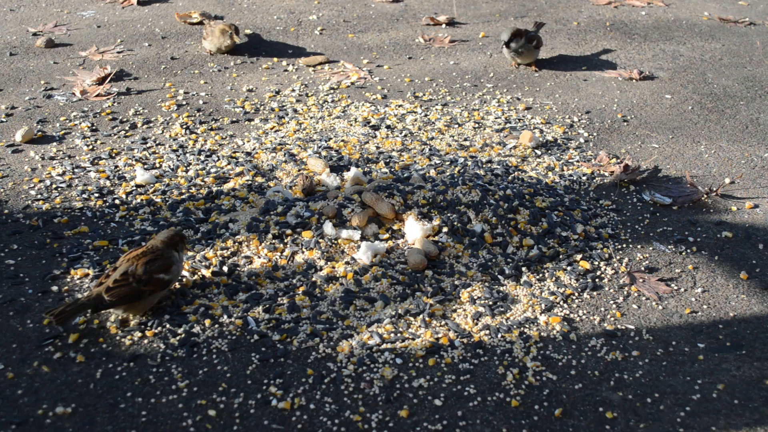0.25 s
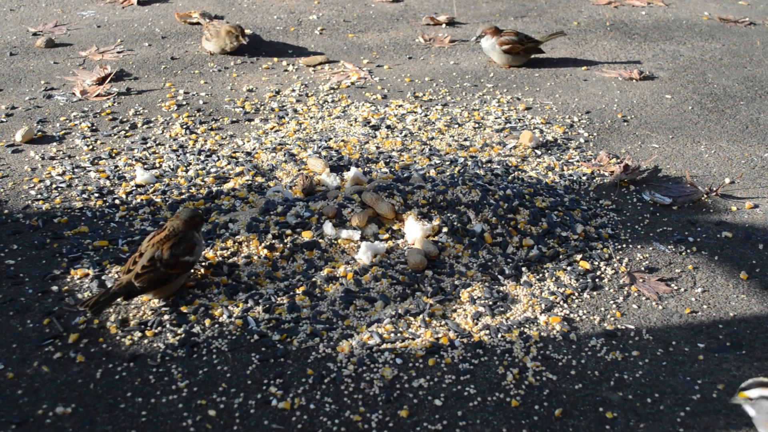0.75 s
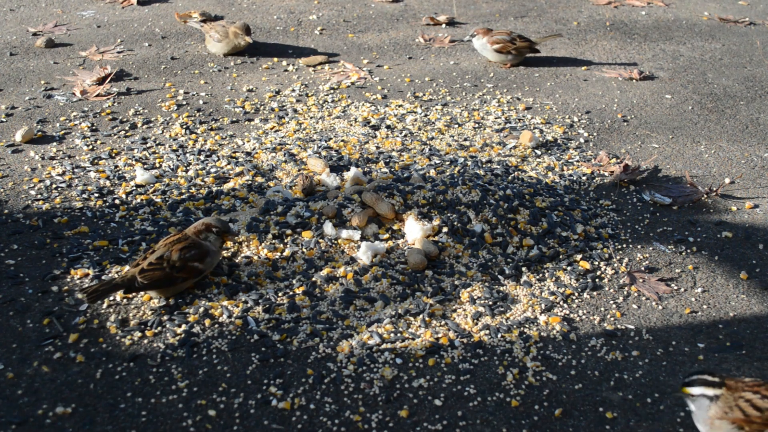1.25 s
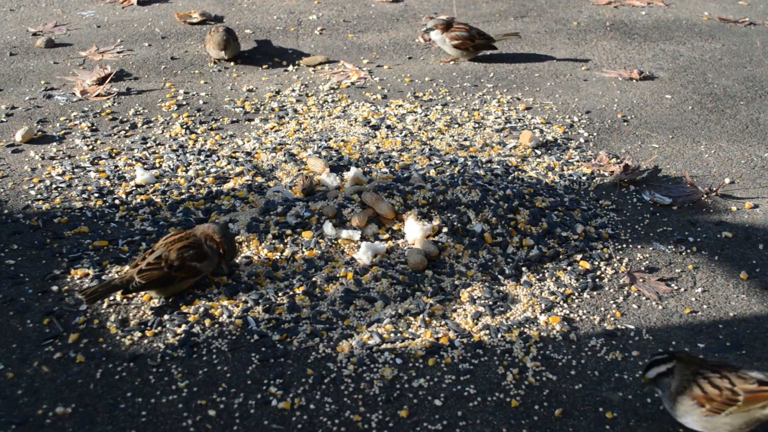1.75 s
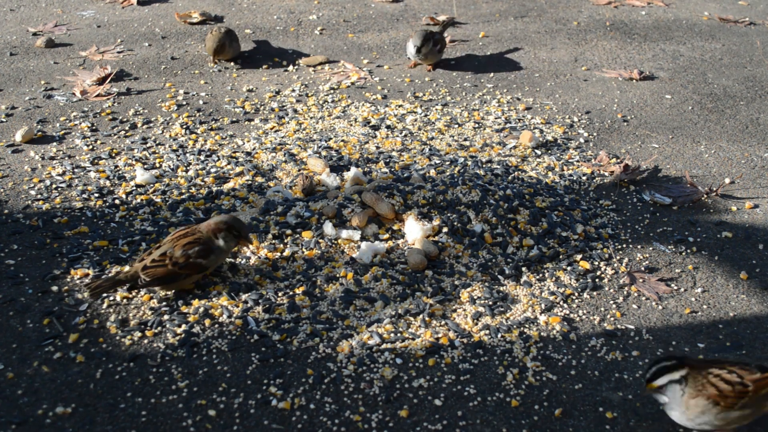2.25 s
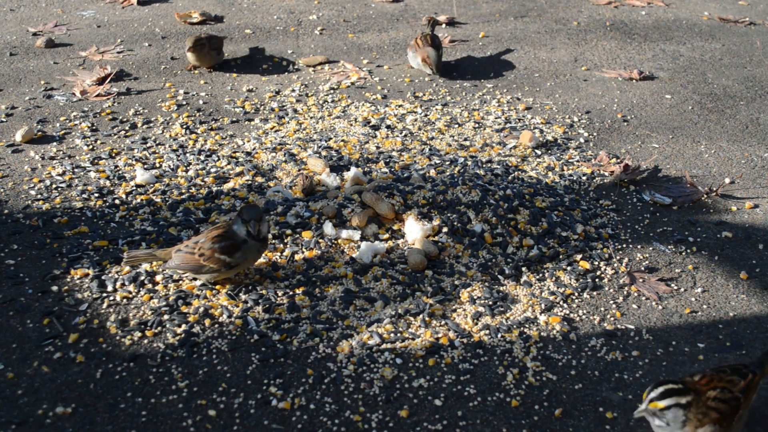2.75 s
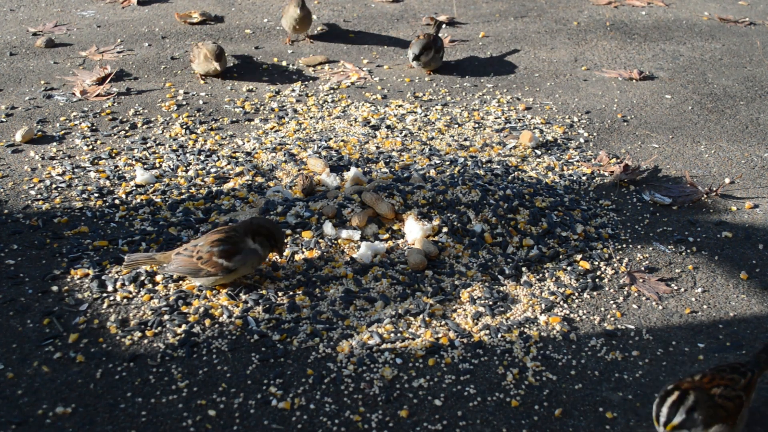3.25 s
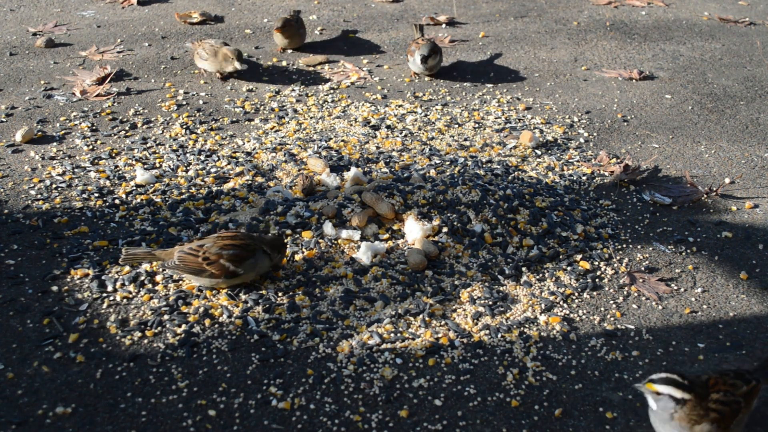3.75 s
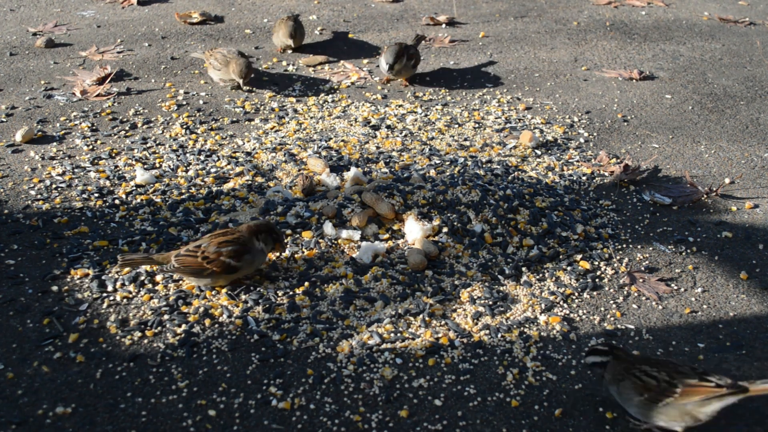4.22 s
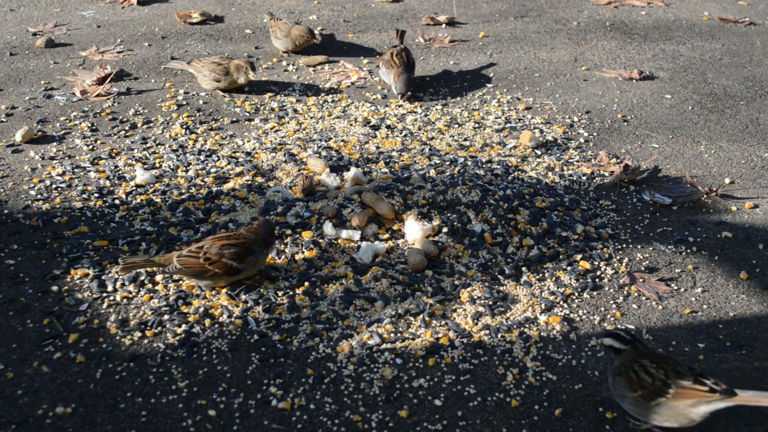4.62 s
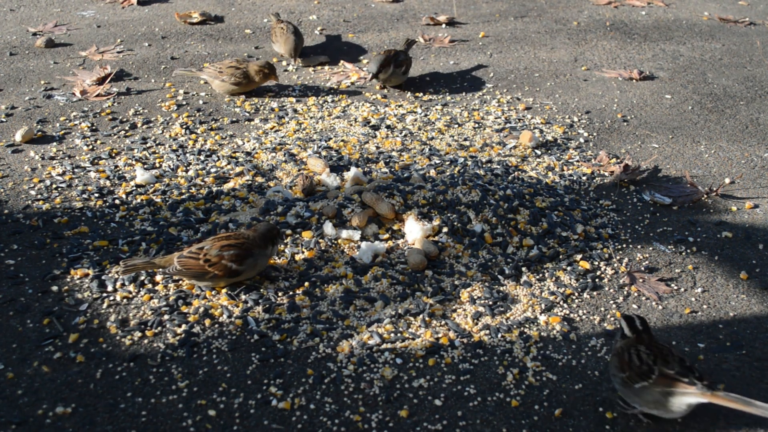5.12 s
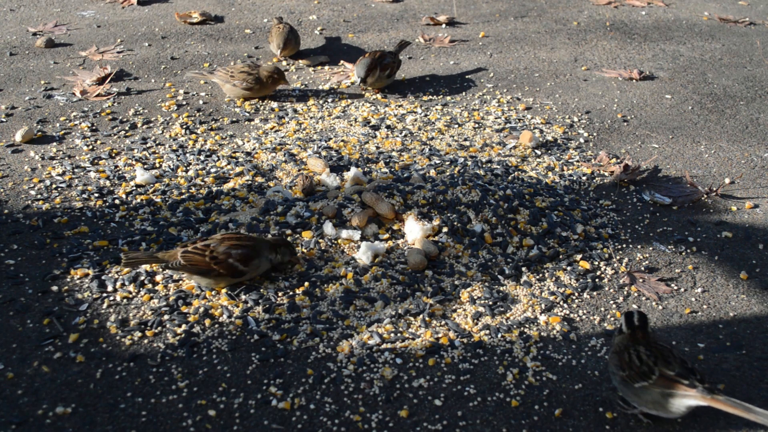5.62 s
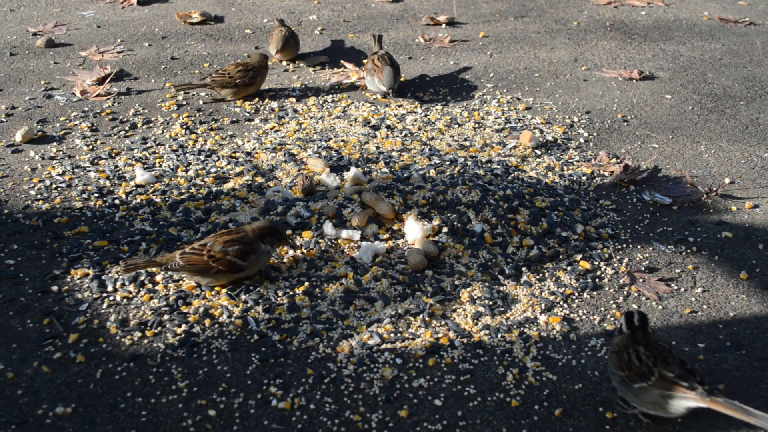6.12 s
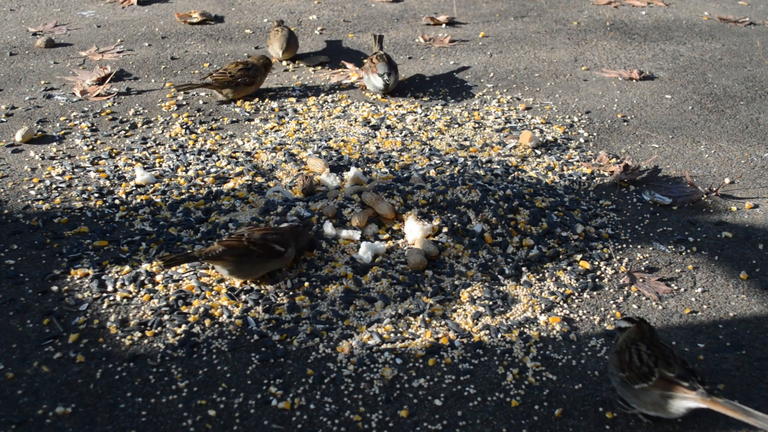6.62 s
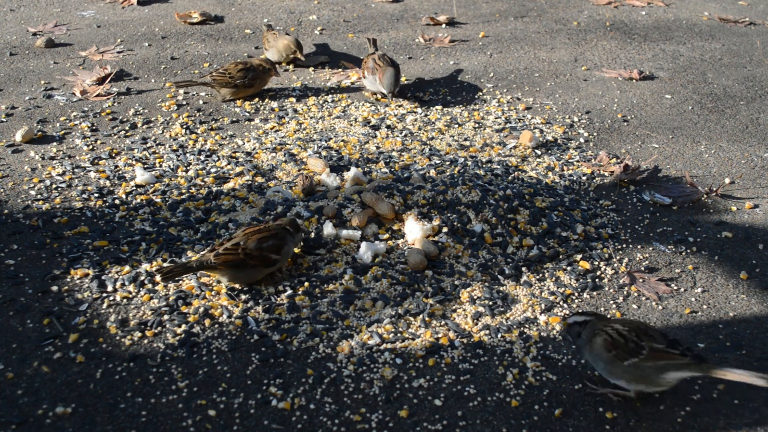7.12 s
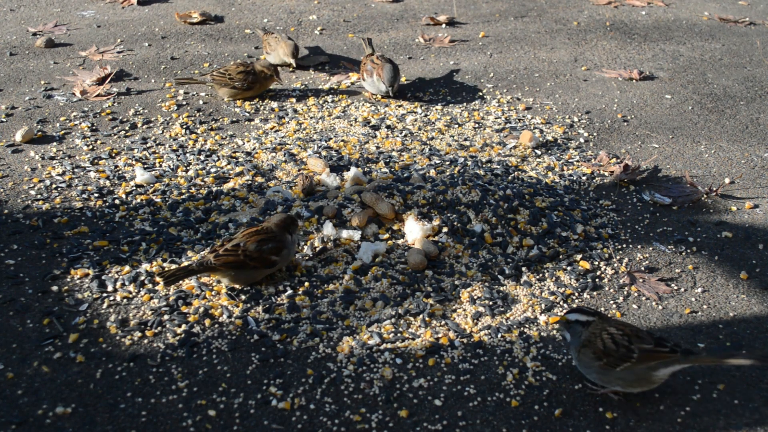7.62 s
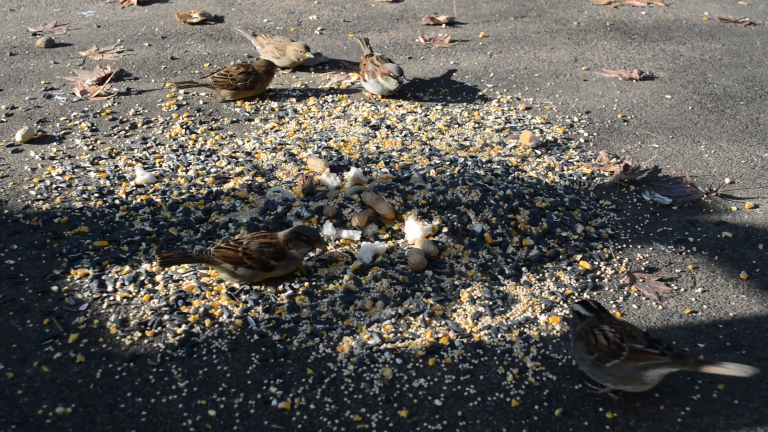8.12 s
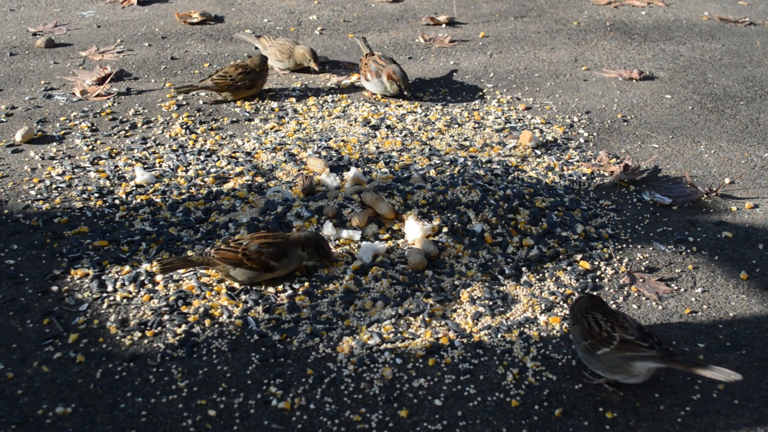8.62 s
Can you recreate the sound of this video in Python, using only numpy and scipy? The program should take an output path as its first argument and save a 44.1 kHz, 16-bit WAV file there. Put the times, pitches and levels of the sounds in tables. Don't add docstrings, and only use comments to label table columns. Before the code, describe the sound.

A close microphone on pavement catches seed hulls splitting in crisp, bright clicks, beaks tapping, and grains ticking as birds move. Delicate chime-like clinks scatter through, thickening in the second half. Two quick hollow wing beats, later a duller flutter, then a feathery landing whoosh break the pecking. Behind lie faint low traffic hum, soft hiss and a steady high electronic whine, with momentary thinning gaps and little echo.

```python
import sys
import numpy as np
from scipy import signal
from scipy.fft import rfft, irfft
from scipy.io import wavfile
from scipy.ndimage import uniform_filter1d, minimum_filter1d

SR = 44100
rng = np.random.default_rng(int(sys.argv[2]) if len(sys.argv) > 2 else 0)


def voltage_ratio(level):
    return 10 ** (np.asarray(level, float) / 20)


def waveform_to_disk(signal):
    frames = np.transpose(np.atleast_2d(signal))
    scaled = np.clip(frames, -1, 1) * 32767
    samples = np.round(scaled).astype(np.int16)
    wavfile.write(sys.argv[1], SR, samples)


N = 390725

CHIME_MODES = [(1545, 1604, 3472, 3628, 4042, 6363, 6395), (1545, 1604, 2923, 4042, 7375, 11498),
               (1545, 4042, 5194, 5760, 6228, 7375), (3472, 6761, 6815, 7375, 9167, 10502),
               (2923, 3719, 4042, 5760, 6228, 6395, 7375, 8284, 8893),
               (3472, 4586, 8408, 8473, 9501, 10852, 11267, 11337), (2029, 3359, 8408, 10852),
               (3359, 4225, 5404, 6056, 6578, 9636), (3719, 5060, 8893), (3628, 4586, 5060, 8408, 9991),
               (4166, 5060, 6976, 7821, 9167), (4225, 9356), (4166, 4225, 9636, 9695, 11267),
               (9695, 10239, 10325, 11035, 12037, 12150, 12182), (10131, 10852, 10933, 11773, 13571),
               (1713, 3478), (1781, 4591)]
# frequency in Hz, gain in dB.
CAPSULE_COLOUR = [(1200, 7.5), (3000, 3), (6000, -0.5), (8300, -2), (9800, 3), (12000, -4.5), (16500, -15)]
WHINE_HZ = 15687.3


def read(points, hz):
    f, value = np.transpose(points)
    return np.interp(np.log(hz + 1), np.log(f + 1), value)


def evened(x):
    return x / np.sqrt(np.mean(x ** 2) + 1e-20)


def add(mix, s, sound):
    part = mix[max(round(s * SR), 0):][:len(sound)]
    part += sound[:len(part)]


def coloured(x, points):
    gain = voltage_ratio(read(points, np.fft.rfftfreq(len(x), 1 / SR)))
    return irfft(rfft(x) * gain, len(x))


def ring(hz, t60, t, phase=0):
    return voltage_ratio(-60 * t / t60) * np.sin(2 * np.pi * (hz * t + phase))


def street():
    # frequency in Hz, density in dB per Hz.
    bed = [(15, -32), (30, -60), (70, 1), (115, 1), (250, -8), (420, -17), (1050, -17), (2150, -20),
           (2700, -26.5), (7000, -29.5), (9600, -26.5), (12000, -39), (15500, -30)]
    frames, hz = N // 256 + 5, np.fft.rfftfreq(1024, 1 / SR)
    a, b, patches = rng.standard_normal((frames, 513, 3)).T
    patches = uniform_filter1d(patches, 14, 0)
    patches = evened(uniform_filter1d(patches, 8, 1))
    z = (a + 1j * b) * voltage_ratio(read(bed, hz)[:, None] + 1.4 * patches)
    noise = signal.istft(z, nperseg=1024, noverlap=768)[1][:N]
    return voltage_ratio(-45.5) * evened(noise)


def steady_tones():
    t = np.arange(N) / SR
    whine = voltage_ratio(-58) * np.sin(2 * np.pi * WHINE_HZ * t)
    hum = voltage_ratio(-53) * np.sin(2 * np.pi * 119.5 * t)
    return whine + hum


def seed_ticks():
    t, out = np.arange(1024) / SR, np.zeros(N)
    ticks_per_s = 4000
    size = voltage_ratio(2.6 * np.minimum(rng.exponential(1, N), 4)) * (rng.random(N) < ticks_per_s / SR)
    kind = rng.integers(0, 30, N)
    pitches = np.linspace(3400, 14000, 30) + rng.uniform(-300, 290, 30)
    lengths = rng.permutation(np.geomspace(6, 45, 30))
    for k, (hz, cycles) in enumerate(zip(pitches, lengths)):
        grain = ring(hz, cycles * 2.3 / hz, t)
        grain = grain / np.linalg.norm(grain)
        out += signal.oaconvolve(size * (kind == k), grain)[:N]
    return out


def breeze_touches():
    out, t = np.zeros(N), np.arange(4096) / SR
    touches_per_s, t60_s = 90, 0.08
    modes = sorted({hz for piece in CHIME_MODES for hz in piece if hz > 3300})
    chance = rng.random((round(touches_per_s * N / SR), 3))
    for at, which, strength in chance:
        hz = modes[int(which * len(modes))]
        add(out, at * N / SR, strength ** 2 * ring(hz, t60_s, t))
    return out


def rustle():
    # time in seconds, level in dB.
    swell = [(0.0, -47), (0.19, -53), (0.67, -58.5), (2.74, -55.5), (3.5, -50.5), (4.14, -55.5),
             (4.39, -51.5), (4.81, -54), (4.91, -51), (5.31, -58), (5.53, -50.5), (6.69, -52.5),
             (6.96, -49), (7.72, -52), (7.95, -50), (8.86, -54.5)]
    out = evened(seed_ticks()) + voltage_ratio(-9) * evened(breeze_touches())
    out = coloured(out, CAPSULE_COLOUR)
    out = coloured(out, [(9800, -4.5), (12000, -4), (14500, -12)])
    s, db = np.transpose(swell)
    return voltage_ratio(np.interp(np.arange(N) / SR, s, db)) * evened(out)


def wings():
    # start in seconds, peak in dB, thump in Hz, length in seconds, swish in dB.
    strokes = [
        (5.611, -28.5, 777, 0.022, -6.5),
        (5.648, -31, 780, 0.01, -3),
        (6.586, -33, 638, 0.07, -12),
        (6.637, -35.5, 1156, 0.022, -7),
        (6.685, -35, 810, 0.019, -8),
        (7.98, -33, 940, 0.034, -5.5),
        (8.013, -39, 520, 0.15, -7),
        (8.198, -41, 920, 0.03, -3),
    ]
    # start in seconds, length in seconds, level in dB.
    downwash = [
        (7.973, 0.092, -47),
        (8.099, 0.29, -51),
        (6.56, 0.16, -49.5),
    ]
    out, t = np.zeros(N), np.arange(4096) / SR
    feathers = [(450, -17), (900, -7.0), (2000, -11.5), (5000, -16.5), (10000, -13.5), (14000, -33)]
    noises = rng.standard_normal((len(strokes), len(t)))
    for (s, db, hz, length, swish_db), noise in zip(strokes, noises):
        fade = np.minimum(t / 0.00048, 1) * np.exp(-(t / length) ** 2)
        swish = voltage_ratio(swish_db) * evened(coloured(noise, feathers)) * fade
        thump = 1.37 * ring(hz, 0.029, t) + 0.79 * ring(1.86 * hz, 0.028, t)
        add(out, s, voltage_ratio(db) * (np.minimum(t / 0.0027, 1) * thump + swish))
    for s, length, db in downwash:
        puff = coloured(rng.standard_normal(16384), [(120, -16), (250, -6), (520, -5), (900, -29)])
        u = np.arange(len(puff)) / SR / length
        add(out, s, voltage_ratio(db) * evened(puff) * np.minimum(10 * u, 1) * np.exp(-u ** 2))
    return out


def flutter(t):
    flutter_s, depth_db = 0.005, 4
    width = round(flutter_s * SR)
    drift = uniform_filter1d(rng.standard_normal((40, len(t))), width, axis=1)
    drift = evened(uniform_filter1d(drift, width, axis=1))
    return depth_db * drift * np.minimum(t / flutter_s / 3, 1) ** 2


def high_spray(t):
    modes = []
    for hz in rng.uniform(1800, 15000, 120):
        gain = voltage_ratio(1.7 * read(CAPSULE_COLOUR, hz)) * min(hz / 6500, 1) ** 2
        modes.append(gain * ring(hz, 0.055, t, rng.random()))
    return np.array(modes)


def piece_rings(modes, voicing, t):
    rings = []
    for hz, (db, t60) in zip(modes, voicing):
        linger = voltage_ratio(-12 - 0.21 * hz / 1000)
        rings.append(voltage_ratio(db) * (ring(hz, t60, t) + linger * ring(hz + 1.5, 2.8 * t60, t)))
    return np.array(rings)


def blow_shade(s, modes, chance_db):
    # time in seconds, tilt in dB per octave.
    treble_tilts = [(1.18, -2), (1.227, -6), (1.741, 9), (3.28, -1), (4.229, 9), (4.419, 8), (5.08, -19),
                    (5.465, -8), (6.104, -16), (6.201, -6), (6.313, 8), (6.848, -14), (7.04, -18), (7.07, 23),
                    (7.145, -10), (7.203, -14), (7.526, -10), (7.626, -6), (8.059, 9), (8.472, -27)]
    # time in seconds, mode in Hz.
    weak_modes = [(7.859, 9356), (7.04, 4225), (6.835, 4225), (5.08, 3472), (3.53, 6228), (2.09, 9356),
                  (5.983, 9356), (4.718, 9636), (8.059, 9991), (7.069, 8893), (3.471, 9356),
                  (7.952, 9695), (6.313, 9356), (3.76, 11773), (3.411, 3359), (4.718, 6578), (.414, 9167),
                  (6.436, 6228), (8.471, 5194), (7.203, 6395), (1.741, 9167)]
    tilt_db = sum(db for at, db in treble_tilts if abs(at - s) < 0.005)
    tilt_from_hz = 5500
    shade_db = chance_db + tilt_db * np.log2(np.maximum(modes, tilt_from_hz) / tilt_from_hz)
    weak = [any(abs(at - s) < 0.004 and f == hz for at, f in weak_modes) for hz in modes]
    return shade_db - 10.0 * np.array(weak)


def chime():
    # mode level in dB, t60 in seconds.
    voices_a_g = [
        [(-16, 0.26), (-44, 0.36), (-2.5, 0.13), (-22, 0.15), (-36, 0.3), (-10, 0.054), (2, 0.1)],
        [(-17.5, 0.52), (-31, 0.37), (-16, 0.24), (-13.5, 0.21), (1, 0.051), (-14, 0.06)],
        [(-15, 0.31), (-7, 0.26), (1.5, 0.12), (-13, 0.16), (-1, 0.33), (-14, 0.18)],
        [(2.5, 0.17), (-18, 0.14), (-0.5, 0.13), (-1, 0.13), (13, 0.051), (-1, 0.067)],
        [(-12, 0.37), (-12, 0.29), (-15, 0.46), (-5, 0.33), (-11, 0.18), (-6.5, 0.38), (-6, 0.08), (4, 0.13),
         (2, 0.19)],
        [(-4, 0.16), (-2, 0.13), (-9.5, 0.34), (-12, 0.12), (-11, 0.07), (-13, 0.16), (-27, 0.11), (-22, 0.1)],
        [(-5, 0.58), (-2, 0.057), (7, 0.05), (-16, 0.1)],
    ]
    # mode level in dB, t60 in seconds.
    voices_h_q = [
        [(-5, 0.093), (-5.5, 0.094), (7, 0.039), (-6, 0.045), (-7, 0.13), (6, 0.047)],
        [(-11.5, 0.069), (2.5, 0.084), (-15, 0.17)],
        [(-22, 0.078), (-10, 0.098), (-8, 0.073), (-10.5, 0.11), (-5.5, 0.087)],
        [(-9, 0.14), (-7, 0.096), (-10.5, 0.18), (-2, 0.1), (4.5, 0.066)],
        [(-3, 0.19), (0, 0.06)],
        [(-9, 0.16), (-43, 0.18), (3, 0.079), (-14, 0.061), (-13, 0.1)],
        [(4, 0.047), (0, 0.043), (-13, 0.27), (-6, 0.07), (-19, 0.11), (-0.5, 0.043), (-25, 0.21)],
        [(-11, 0.3), (-21, 0.08), (-10, 0.12), (-12, 0.095), (-26, 0.17)],
        [(4.5, 0.69), (-22, 0.18)],
        [(-7.5, 0.72), (-16, 0.17)],
    ]
    # time in seconds, blow in dB.
    blows_a = [(0.443, -46.5), (1.313, -38), (1.375, -44.5), (3.551, -47), (4.808, -37.5), (5.08, -39),
               (7.07, -41), (7.203, -34), (7.664, -44.5), (8.472, -43)]
    blows_b = [
        (4.229, -29.5),
        (6.104, -41),
        (8.173, -45),
    ]
    blows_c = [(3.53, -35), (4.774, -41), (5.349, -45), (6.436, -43), (7.145, -56), (7.425, -45),
               (8.084, -46.5), (8.471, -41)]
    blows_d = [
        (4.419, -62),
        (5.08, -35.5),
        (6.823, -46),
        (7.203, -52),
        (8.355, -36.5),
    ]
    blows_e = [(1.18, -41.5), (4.774, -42.5), (5.349, -41), (7.145, -45), (7.664, -49), (8.035, -45.5)]
    blows_f = [(0.082, -32.5), (1.151, -45.5), (1.228, -38), (1.375, -46), (1.79, -35), (3.162, -41.5),
               (3.793, -33.5), (4.353, -38), (4.503, -31.5), (4.527, -36.5), (6.241, -41), (6.789, -40.5)]
    blows_g = [
        (4.354, -43.5),
        (7.664, -47),
    ]
    blows_h = [(0.018, -44), (2.721, -43), (3.411, -28), (4.718, -39), (5.39, -43), (5.465, -41),
               (6.314, -47), (6.995, -58), (7.857, -52)]
    blows_i = [(0.442, -44), (2.021, -45), (2.19, -40.5), (3.793, -30.5), (4.035, -44.5), (4.975, -40.5),
               (5.032, -38.5), (5.08, -33), (5.522, -40.5), (5.632, -39.5), (6.202, -43), (6.3, -49),
               (6.313, -36), (6.768, -37), (6.805, -35), (7.069, -29.5), (7.165, -40), (7.485, -39),
               (7.86, -43), (8.129, -51), (8.23, -46), (8.353, -32), (8.569, -47)]
    blows_j = [
        (3.28, -38),
        (5.465, -49),
        (8.059, -29),
        (8.569, -37.5),
    ]
    blows_k = [(0.414, -45), (0.604, -44.5), (1.741, -43.5), (3.793, -33), (5.688, -44.5), (6.029, -29)]
    blows_l = [(0.0203, -34.5), (1.825, -46), (2.088, -38), (3.471, -32.5), (3.793, -36), (4.529, -50),
               (4.717, -30), (5.005, -40), (5.065, -40), (5.73, -36.5), (5.983, -34), (6.313, -35.5),
               (6.835, -37), (6.848, -28), (6.994, -33.5), (7.039, -37), (7.526, -40.5), (7.859, -33),
               (8.696, -50)]
    blows_m = [
        (4.047, -31.5),
        (5.388, -30.5),
        (6.104, -39),
    ]
    blows_n = [(0.402, -50), (1.149, -45), (1.74, -47), (3.11, -42), (6.791, -50), (7.421, -43),
               (7.627, -34.5), (7.939, -49), (7.952, -36)]
    blows_o = [
        (3.76, -37.5),
        (7.885, -30),
        (8.171, -39),
    ]
    blows_p = [
        (4.229, -54.5),
        (5.349, -58),
        (8.354, -46),
    ]
    blows_q = [
        (0.022, -39.5),
        (1.377, -41),
        (4.501, -39.5),
        (5.227, -41),
    ]
    # time in seconds, level in dB.
    brushes = [(.178, -53), (2.3, -59), (6.215, -51), (6.868, -52), (7.175, -45), (7.262, -55), (7.36, -56),
               (7.748, -53), (8.128, -51), (8.3, -56), (4.462, -53)]
    # time in seconds, mode in Hz,
    # level in dB.
    lone_modes = [(0.08, 9511, -40), (1.312, 8406, -48), (1.741, 6448, -48), (1.79, 9516, -43),
                  (2.09, 9636, -45), (2.479, 9567, -49), (3.497, 10250, -50), (3.603, 5208, -48),
                  (5.003, 4227, -38), (5.404, 6582, -49), (5.687, 5079, -48), (5.732, 5075, -47),
                  (6.105, 10142, -49), (6.197, 4226, -48), (6.77, 10915, -47), (6.771, 8804, -44),
                  (6.791, 7874, -46), (6.824, 11484, -50), (6.833, 10508, -38), (6.833, 10246, -38),
                  (6.992, 6055, -41), (6.993, 5063, -47), (7.148, 3719, -47), (7.433, 10796, -49),
                  (7.426, 5770, -46), (7.493, 10647, -48), (7.485, 9173, -47), (7.628, 9125, -44),
                  (7.664, 12652, -49), (7.858, 9978, -41), (7.86, 8888, -47), (8.058, 3474, -43),
                  (8.355, 4153, -44),
                  (.004, 2033, -54), (.194, 5756, -51), (1.739, 10539, -39), (2.48, 8413, -46),
                       (5.08, 3460, -38.5), (2.022, 3745, -47), (3.76, 11117, -42), (4.228, 8200, -42),
                       (4.717, 6032, -45), (4.718, 9631, -31), (5.003, 9670, -44), (5.08, 7373, -46),
                       (5.688, 3450, -53.5), (5.982, 9270, -30), (6.314, 6578, -43), (6.824, 4591, -48),
                       (6.834, 7878, -40), (6.847, 6074, -48), (6.926, 8047, -45), (6.994, 6578, -46),
                       (7.202, 10192, -48), (7.263, 5071, -51), (7.425, 3630, -48), (7.427, 9138, -43),
                       (7.664, 5880, -43), (8.058, 9600, -28), (8.672, 8800, -41)]

    out, t = np.zeros(N), np.arange(16384) / SR
    rise, brief = 1 - np.exp(-t / 0.00011), t[:3072]
    brief_rise = rise[:len(brief)]
    spray = high_spray(brief)
    flutter_db, flutter_hz = flutter(t), 9000
    pieces = (blows_a, blows_b, blows_c, blows_d, blows_e, blows_f, blows_g, blows_h, blows_i,
              blows_j, blows_k, blows_l, blows_m, blows_n, blows_o, blows_p, blows_q)
    for modes, voicing, blows in zip(CHIME_MODES, voices_a_g + voices_h_q, pieces):
        rings = piece_rings(modes, voicing, t)
        depth = (np.array(modes)[:, None] / flutter_hz) ** 1.5
        for s, blow_db in blows:
            pick = rng.integers(0, len(flutter_db), len(rings))
            waver = voltage_ratio(flutter_db[pick] * depth)
            shade = voltage_ratio(blow_shade(s, modes, rng.standard_normal(len(modes))))
            add(out, s + 0.0008, voltage_ratio(blow_db) * rise * (shade @ (rings * waver)))
            clatter = rng.standard_normal(len(spray)) @ spray
            add(out, s + 0.0011, voltage_ratio(blow_db - 13) * brief_rise * clatter)
    for s, db in brushes:
        add(out, s, voltage_ratio(db) * brief_rise * (rng.standard_normal(len(spray)) @ spray))
    for (s, hz, db), waver_db in zip(lone_modes, np.tile(flutter_db, (2, 1))):
        level = voltage_ratio(db + 6.5 + waver_db * (hz / flutter_hz) ** 2)
        t60_s = 0.15 * 5000 / hz
        add(out, s + 0.0011, level * rise * ring(hz, t60_s, t))
    return out


def cracks():
    # time in
    # seconds, peak in dB, centre in Hz.
    hulls = [(0.0818, -11.5, 8140), (0.3394, -6, 8900), (0.8643, -2.5, 8750), (1.0226, -5, 8300),
             (1.212, -13.5, 6850), (1.8251, -10.5, 9300), (2.5392, -9, 8400), (2.71, -17, 9900),
             (2.8521, -11.5, 6840), (3.1136, -16, 5640), (3.7628, -15, 11100), (3.9114, -10, 9300),
             (4.0585, -15.5, 3800), (4.27, -17, 9700), (4.5959, -14.5, 5400), (4.8294, -17, 6750),
             (5.1092, -13.5, 5860), (5.184, -13.5, 7060), (5.196, -8, 9600), (5.2271, -12.5, 6500),
             (5.6329, -6.5, 9150), (5.6742, -19, 8700), (6.4382, -17, 11000), (6.6295, -21, 8200),
             (7.3844, -14, 6900), (7.4529, -18.5, 9500), (7.666, -14, 8240), (7.715, -13.5, 9000),
             (7.8062, -16, 5400), (8.6389, -14.5, 9000), (8.674, -12, 9200)]
    # time in seconds, peak in dB.
    near_taps = [(0.1396, -24), (0.725, -25.5), (1.4608, -25), (2.0506, -27), (2.352, -22), (2.368, -23),
                 (2.4171, -27), (2.8978, -23), (2.955, -28), (3.07, -25), (3.075, -18), (3.14, -19),
                 (3.194, -23), (3.6513, -23), (4.93, -21.5), (5.067, -35), (5.1404, -37), (5.4603, -27),
                 (5.6118, -23), (5.7872, -19), (5.811, -26), (6.4077, -19), (6.4441, -22), (6.6816, -26),
                 (6.7295, -20), (7.409, -26), (7.557, -27), (8.4896, -19), (8.832, -26), (8.84, -26)]
    far_taps = [0.322, 0.5094, 0.801, 1.089, 1.387, 2.2353, 3.2244, 3.683, 8.174]
    # time in
    # seconds, peak in dB, centre in Hz.
    small_ticks = [(0.584, -27, 7400.0), (1.9016, -21, 5370), (1.925, -30, 5900.0), (2.2535, -30, 8600.0),
                   (2.3803, -29, 5500.0), (2.3967, -28, 6100.0), (2.6557, -27.5, 8100.0),
                   (2.8443, -23, 10200.0), (2.8744, -21, 8000.0), (2.98, -31, 9400.0),
                   (3.0337, -26, 9100.0), (3.1454, -29, 7400.0), (3.2927, -20.5, 8800.0),
                   (3.5014, -25, 10000.0), (4.8722, -22.5, 4900.0), (5.5719, -25, 8800.0),
                   (5.7537, -25, 5800.0), (6.4645, -27, 6100.0), (6.649, -17, 8600.0), (6.93, -21, 8300.0),
                   (7.5625, -30, 8700.0), (7.6743, -15, 8200.0), (8.5655, -29, 8200), (8.6525, -30, 9400.0),
                   (8.7585, -25, 9500.0), (8.7653, -23, 8100)]

    out, t = np.zeros(N), np.arange(1024) / SR
    hz, late = np.fft.rfftfreq(len(t), 1 / SR), t - 0.002
    burst = np.exp(-(late / 0.00018) ** 2) + 0.2 * np.exp(-((late - 0.0008) / 0.0006) ** 2)
    crumble = voltage_ratio(-31) * (late > 0) * voltage_ratio(-60 * late / 0.035)
    click = 2.4 * (np.arange(len(t)) == round(SR / 500))
    taps = near_taps + [(s, -30.5) for s in far_taps]
    tap_hz, tap_spread = 9300, 0.033
    taps = [(s, db, tap_hz * (1 + tap_spread * rng.standard_normal())) for s, db in taps]
    for s, db, centre_hz in hulls + taps + small_ticks:
        noise = rng.standard_normal(len(t))
        body = 0.22 * (8000 / centre_hz) ** 1.9 + np.exp(-(np.log((hz + 1) / centre_hz) / 0.41) ** 2)
        colour = voltage_ratio(0.77 * read(CAPSULE_COLOUR, hz)) * body
        colour = colour * np.minimum(hz / (0.36 * centre_hz), 1)
        lag_s = rng.uniform(0.00015, 0.00035)
        bounce = 1 + 0.3 * np.exp(-2j * np.pi * hz * lag_s)
        snap = irfft(rfft(click + 0.61 * noise * (burst + crumble)) * colour * bounce)
        add(out, s - 0.002, voltage_ratio(db - 1.5) * snap / abs(snap).max())
    return out


def yard(x):
    at = np.arange(60, 6000, 20)
    echoes = np.zeros(6100)
    signs = rng.choice([-1., 1.], len(at))
    echoes[at + rng.integers(0, 20, len(at))] = signs * voltage_ratio(-60 * at / SR / 0.29)
    return signal.oaconvolve(x, echoes / np.linalg.norm(echoes))[:N]


def scene():
    near = wings() + chime() + cracks()
    mix = street() + steady_tones() + rustle() + near + voltage_ratio(-17) * yard(near)
    return np.tile(mix, (2, 1))


def dropouts(x):
    # start in seconds, end in seconds, leak in dB, held tone in Hz.
    gaps = [(.056, .07, -25, 4215), (.883, .905, -18, 3666), (1.355, 1.367, -12, 3542),
            (1.524, 1.542, -14, 2126), (1.716, 1.733, -22, 5189), (2.184, 2.201, -13, 5022),
            (2.44, 2.475, -35, 2266), (2.805, 2.819, -14, 3736), (3.361, 3.374, -14, 4591),
            (4.428, 4.437, -14, 6800), (5.493, 5.507, -14, 4220), (5.77, 5.785, -12, 3480),
            (5.878, 5.892, -12, 2121), (6.176, 6.19, -14, 4155), (6.302, 6.309, -16, 4150),
            (6.538, 6.572, -35, 1523), (7.902, 7.916, -28, 3434), (8.099, 8.108, -14, 3480),
            (8.18, 8.195, -14, 960), (8.69, 8.703, -25, 3434)]
    # time in seconds, level in dB rms, list of tones in Hz.
    held_tones = [(.894, -61, [3666, 9109]), (1.532, -61, [926, 1556, 2099]),
                  (1.725, -59, [5190, 5798, 9679]), (2.19, -56, [2848, 5039, 9588]),
                  (2.457, -63, [737, 1163, 9335]), (2.812, -62, [3720, 9227, 10067]),
                  (7.909, -49, [3429, 4210, 6401, 9631, 10013, 10896]),
                  (3.368, -60, [4592, 5491, 6358, 8646, 9502]),
                  (4.432, -50, [6740, 7321, 8495, 9103, 10040, 11750]), (5.777, -56, [3472, 7887, 9755]),
                  (5.886, -61, [2110, 5749, 9152]), (6.555, -58, [689, 1114, 1534, 3903]),
                  (8.188, -52, [969, 3052, 4850, 8086, 10131, 11520]),
                  (8.697, -50, [8657, 9382, 9706, 10992])]
    hz, _, z = signal.stft(x, SR, nperseg=512, noverlap=384)
    smooth = uniform_filter1d(abs(z), 5, 0)
    ground = uniform_filter1d(minimum_filter1d(smooth, 15, 0), 9, 0)
    strong = abs(z) > 6 * ground
    bass, whine = hz[:, None] < 330, abs(hz[:, None] - WHINE_HZ) < 200
    lines = signal.istft(z * (strong | bass | whine), SR, nperseg=512, noverlap=384)[1][:N]
    t, gate, held = np.arange(N) / SR, np.zeros(N), np.zeros(N)
    for start, end, leak_db, tone_hz in gaps:
        slope = np.minimum((t - start) / 0.0057, (end - t) / 0.013) + 0.5
        gate = np.maximum(gate, np.clip(slope, 0, 1 - voltage_ratio(leak_db)))
        kept = [(f, db) for s, db, found in held_tones if start < s < end for f in found]
        kept = kept or [(tone_hz, -58), (9800, -58)]
        spill = np.clip(np.minimum(t - start, end - t) / 0.013 + 1, 0, 1)
        held += spill * sum(voltage_ratio(db + 3.5) * np.sin(2 * np.pi * f * t) for f, db in kept)
    return (1 - gate) * x + gate * lines + held


def roll_off(x):
    return signal.sosfilt(signal.butter(12, 17150, fs=SR, output="sos"), x)


def record(dry):
    # frequency in Hz, gain in dB.
    band_limit = [(15750, 0), (15950, -34), (16900, -33), (17200, -80)]
    x = coloured(dropouts(dry[0]), band_limit)
    loudness = np.clip(uniform_filter1d(abs(x), 40) / 0.08, 0, 1)
    trace = voltage_ratio(-28) * np.roll(np.diff(x, prepend=0), 3) * loudness ** 3
    return roll_off(np.array([x + trace, x - trace]))


dry = scene()
out = record(dry)
waveform_to_disk(out)
```